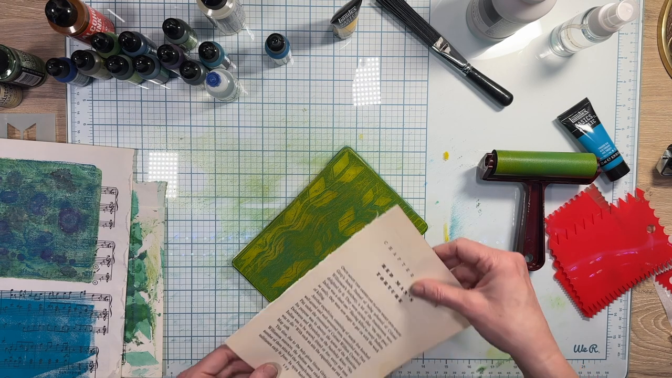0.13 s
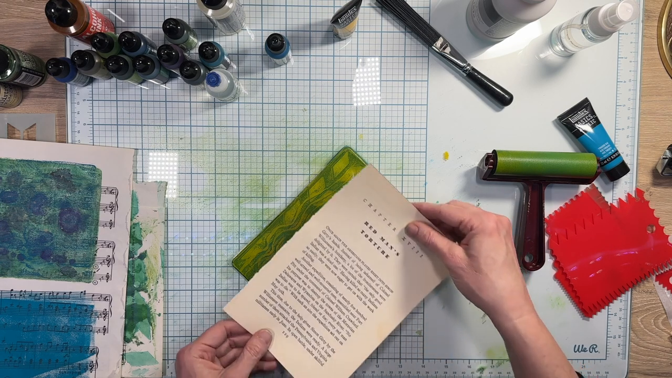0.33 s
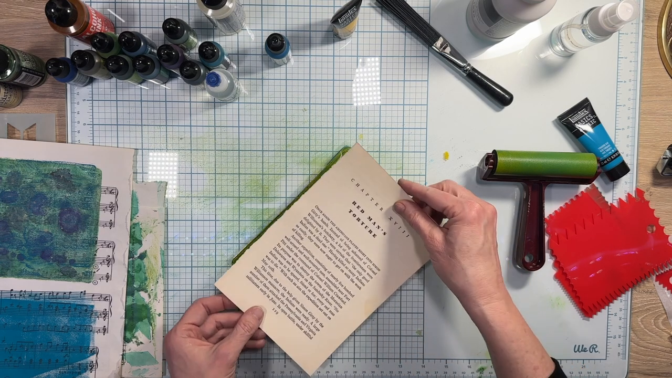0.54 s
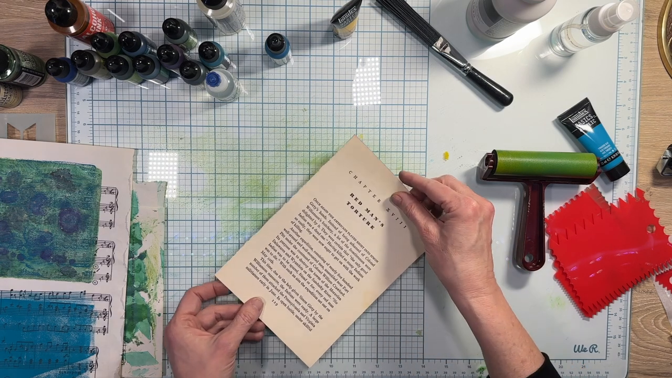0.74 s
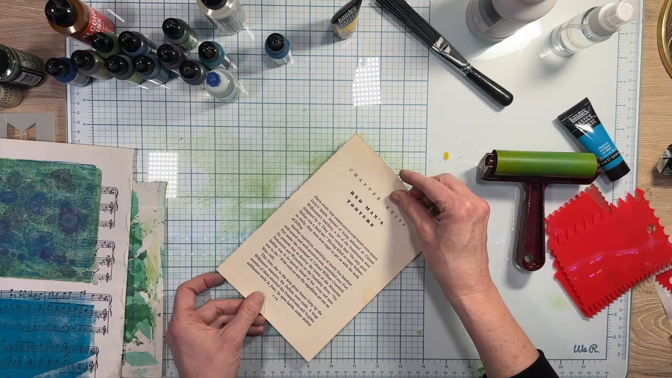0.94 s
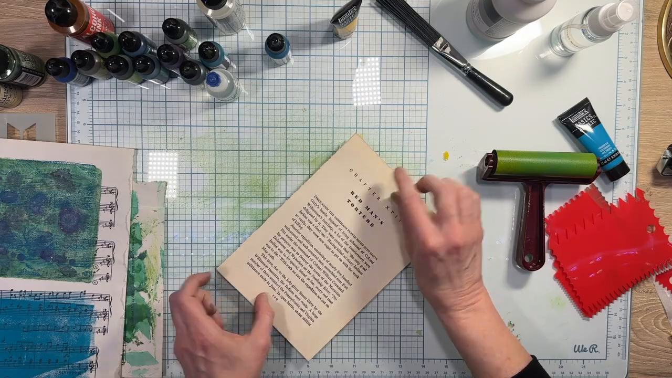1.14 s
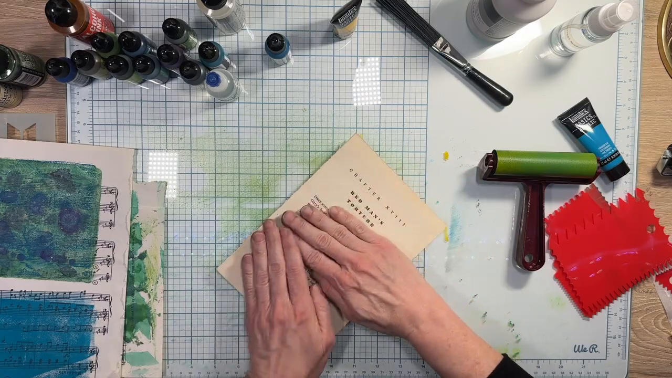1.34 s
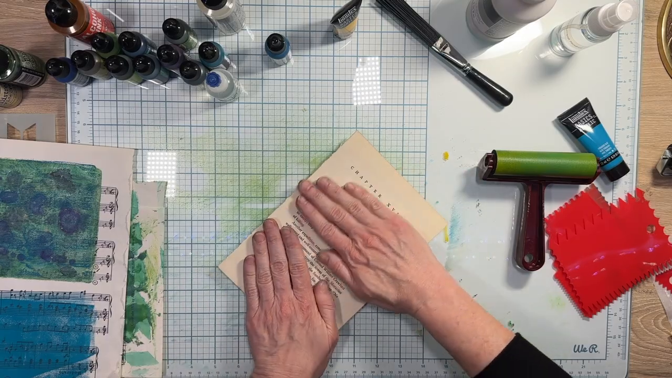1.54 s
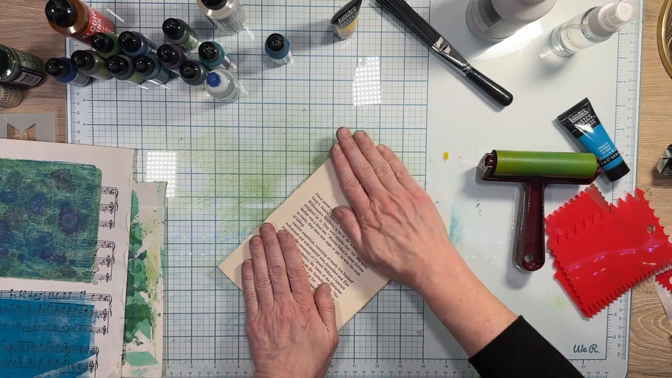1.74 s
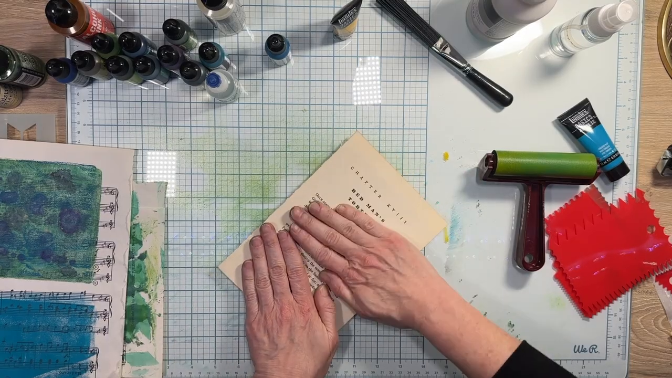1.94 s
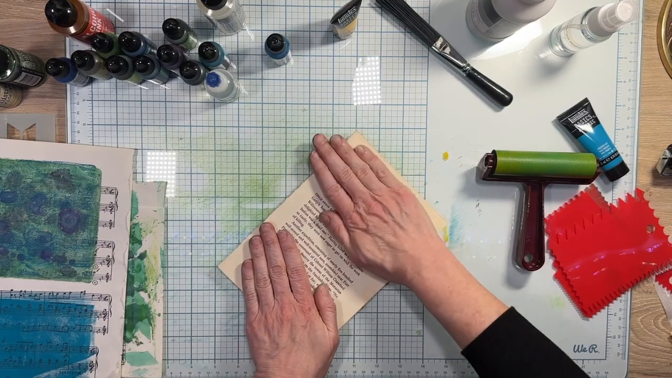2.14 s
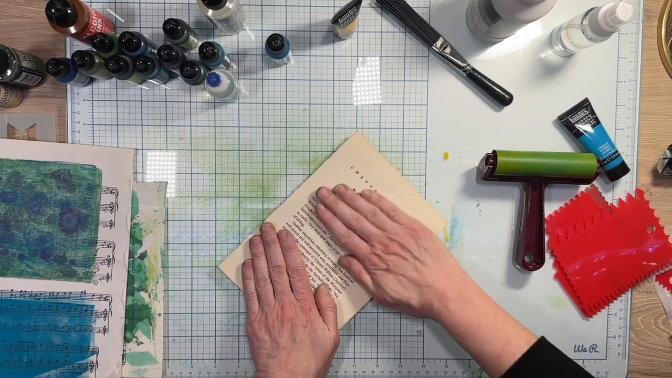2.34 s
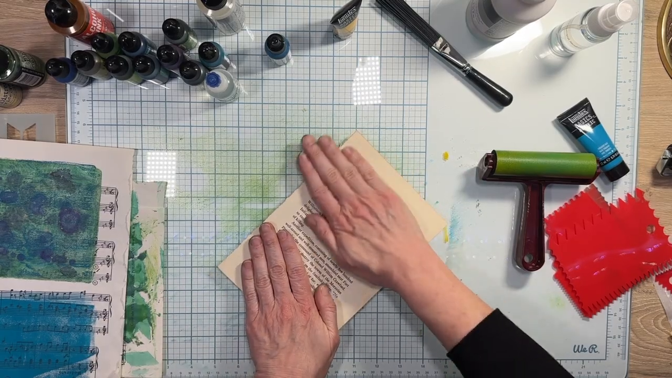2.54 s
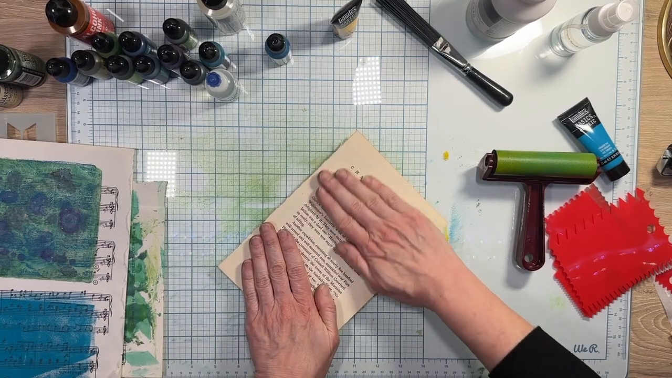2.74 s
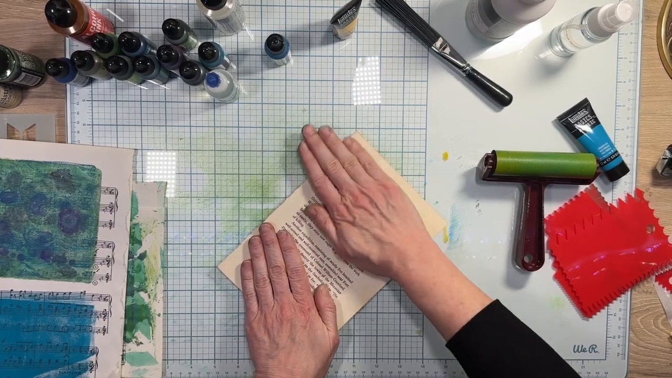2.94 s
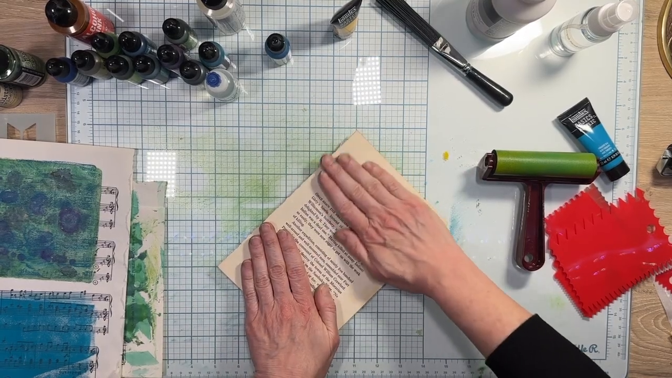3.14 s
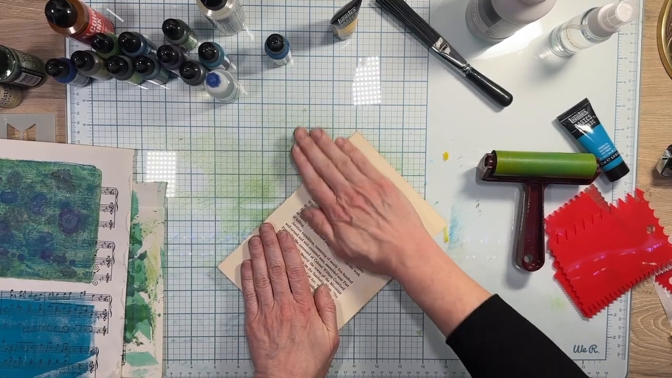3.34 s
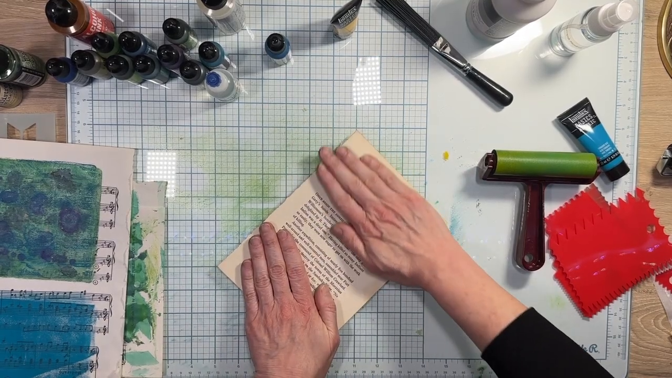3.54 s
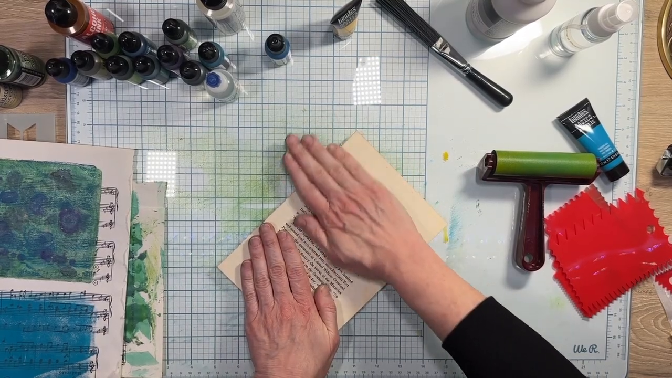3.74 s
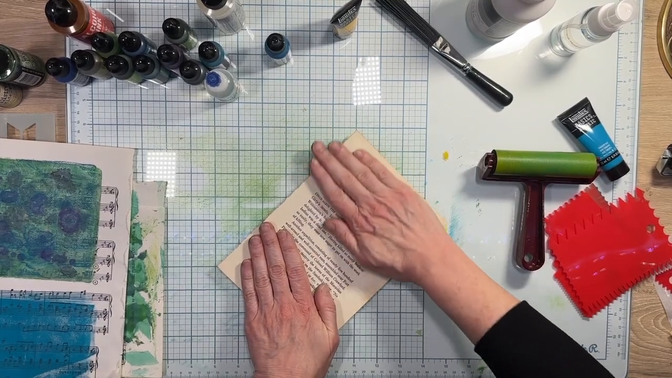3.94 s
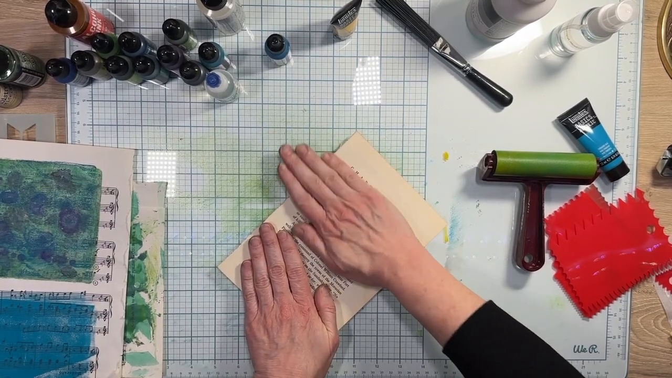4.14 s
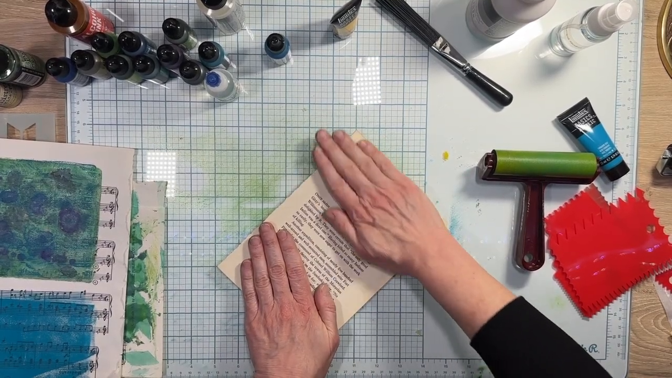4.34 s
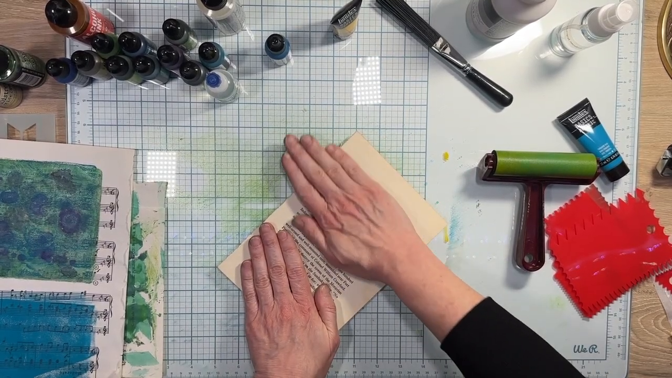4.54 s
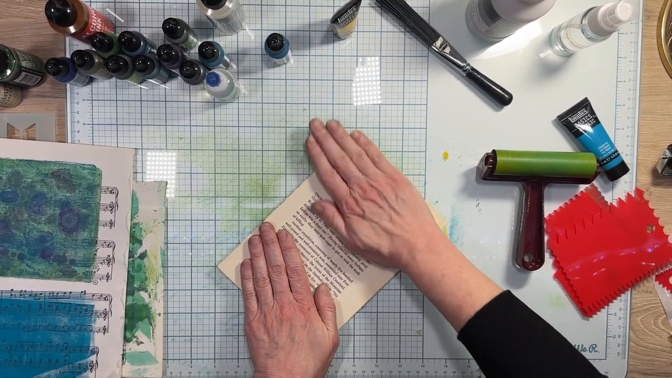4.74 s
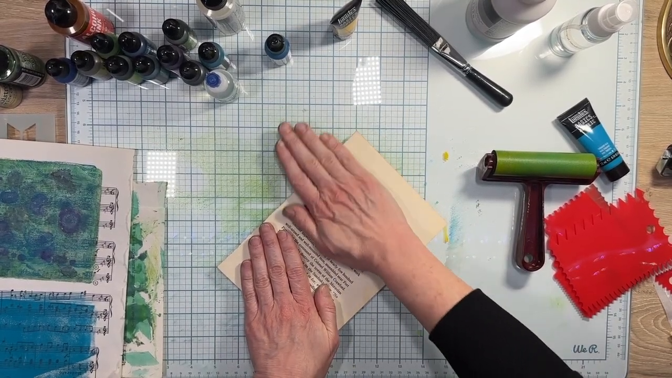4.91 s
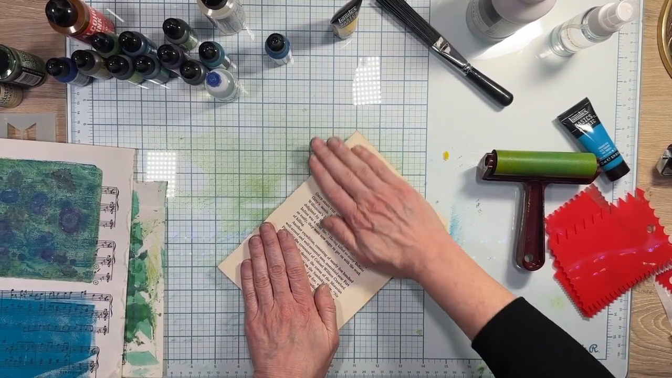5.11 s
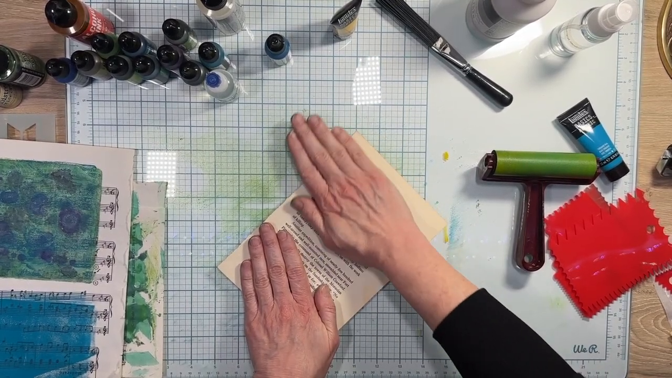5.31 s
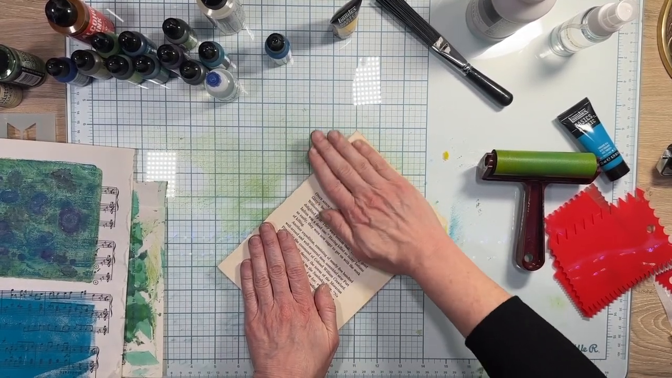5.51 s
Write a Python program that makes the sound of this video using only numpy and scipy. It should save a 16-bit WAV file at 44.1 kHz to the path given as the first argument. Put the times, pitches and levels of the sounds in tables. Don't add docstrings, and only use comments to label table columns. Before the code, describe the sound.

In a small, quiet, rather dry room, paired microphones close above a craft table catch a sheet of paper being laid on a soft printing plate. At 0 s the sheet buckles with a papery flutter, then flaps at 0.12 s with a sharp crack, the loudest moment. Soft slides fade until about 0.75 s, with a faint airy whistle rising at 0.15-0.45 s. Light finger brushes follow, then a crisp pat and snap at 1.06 s. Near 1.38 s a gentler snap and a low, dull table thump mark the palm settling. From 1.5 s the palm rubs back and forth: fine, bright, dry hissing swishes, clearly separated until 2.3 s, then faster and more continuous, about five per second, alternating slightly in brightness. Faint low table hum, barely audible tones from plate and mat, and very quiet room air lie beneath. The rubbing continues to the end, around 5.7 s.

```python
import sys
import numpy as np
from scipy import signal
from scipy.fft import rfft, irfft, next_fast_len
from scipy.io import wavfile
from scipy.ndimage import uniform_filter1d

SR = 44100
rng = np.random.default_rng(int(sys.argv[2]) if len(sys.argv) > 2 else 0)


def convert_level_to_amplitude(level_db):
    exponent = np.asarray(level_db, float) / 20
    return 10 ** exponent


def wrap_up_sound(samples):
    columns = np.atleast_2d(samples).T
    tamed = np.clip(columns, -1, 1)
    steps = np.round(tamed * 32767).astype(np.int16)
    wavfile.write(sys.argv[1], SR, steps)


N = 249945

# (turn [s], hiss at the turn [dB],
# fastest after [s], hiss when fastest [dB], extra sizzle [dB])
PALM_STROKES = [(1.469, -65.5, 0.16, -52, 1), (1.728, -70, 0.14, -51.5, 2.5),
                (1.943, -71, 0.097, -51.5, 0.5), (2.152, -72.5, 0.081, -50.5, 1),
                (2.34, -58, 0.11, -53, 4.5), (2.57, -54, 0.073, -52.5, 1), (2.7, -52.5, 0.14, -53, 5.5),
                (2.936, -58, 0.082, -50, -2), (3.12, -55.5, .08, -53.5, 5.5), (3.33, -55, 0.056, -51, -2),
                (3.5, -56, 0.083, -52, 5), (3.7, -53, 0.04, -51.5, -3), (3.89, -56, 0.076, -52, 3.5),
                (4.151, -54, 0.064, -52.5, -2.5), (4.28, -56, 0.083, -52, 3.5),
                (4.48, -52.5, 0.1, -51, -5.5), (4.67, -58.5, 0.074, -53.5, 3.5),
                (4.85, -53, 0.11, -51, -6.5), (5.071, -54.5, 0.072, -52.5, 3.5), (5.27, -54, 0.09, -51, -5),
                (5.47, -56.5, .08, -54, 4.5), (5.66, -56, .08, -44.5, -17)]
# (start [s], length [s], hiss [dB], sheet against hiss [dB],
# sizzle against hiss [dB])
FREE_SLIDES = [
    (-.04, 0.2, -55.5, -8.5, 2),
    (.13, 0.16, -64.5, 6.5, 9),
    (.24, 0.28, -68, 13, 6),
    (.46, 0.15, -66.5, 13.5, -3.5),
    (.59, 0.098, -72, 14.5, -12),
    (.66, 0.13, -78, 9, -4),
]
PLATE_BRUSHES = [
    (.755, 0.096, -69, 6, -8.5),
    (.86, 0.091, -66.5, -4.5, -7.5),
    (.985, 0.059, -65, -30, -1),
    (1.015, 0.073, -54.5, -17, -1.5),
    (1.095, 0.044, -67, -6, 2.5),
    (1.34, 0.047, -64.5, 4.5, 6.5),
    (1.37, 0.092, -61, -3, 3),
]
# (lowest [Hz], highest [Hz])
RUB_RANGES = [(2500, 7000), (600, 1050), (900, 2200), (8500, 15500)]
REST_LEVELS = [
    [-89],
    [-93],
    [-88],
    [-93],
]
# (frequency [Hz], level per Hz [dB])
FRICTION_COLOUR = [(88, -37), (150, -22.5), (474, -22), (686, -16), (786, -21), (883, -13), (1330, -8),
                   (1680, -3.5), (3140, -1.5), (6570, -2.5), (7830, -1.5), (10900, -1.5), (15800, -6.5)]
# (start [s], level [dB], fade [dB per s])
SHEET_WOBBLES = [
    (0.0, -44.5, 181),
    (.15, -64.5, 128),
]
# (time [s], pitch [Hz], level [dB])
GAP_WHISTLE = [(.13, 3310, -87), (.17, 3600, -60.5), (.24, 4200, -62), (.3, 4605, -63.5), (.36, 5400, -65),
               (.41, 5900, -62), (.46, 6200, -103)]
# (time [s], pitch [Hz], level [dB])
PLATE_SINGING = [(1.4, 691, -110), (1.55, 692, -85), (2.4, 685, -88), (4.2, 696, -88), (4.5, 695, -74.5),
                 (5.3, 694, -78), (5.67, 685, -79)]
# (time [s], pitch [Hz], level [dB])
MAT_SINGING = [(1.5, 340, -105), (1.8, 340, -103), (2.3, 330.6, -94), (2.5, 340, -87), (3.3, 340, -87.5),
               (3.7, 340, -91.5), (5.67, 340, -102)]
# (time [s], peak [dB], length [s], modes fade above [Hz])
SHEET_FLAPS = [
    (0.0, -32, 0.018, 1155),
    (0.022, -36, 0.01, 1150),
    (0.034, -42.5, .008, 1150),
    (0.114, -30, 0.004, 2500),
    (0.1189, -22.5, 0.0061, 3000),
]
# (frequency [Hz], level [dB], 60 dB fade [s])
SHEET_MODES = [(340, -12.5, 0.12), (470, 0.5, 0.028), (567, -12.5, 0.066), (643, -3, 0.06), (853, 8, 0.047),
               (950, 2.5, 0.037), (1020, -1, .035), (1194, -1, 0.044), (1450, 3, 0.034), (1510, 0.5, 0.023),
               (1950, -8, 0.083), (2500, -6, .03), (2655, -12, 0.066)]
# (time [s], peak [dB], centre [Hz])
SHEET_PATS = [(0.765, -55, 2500), (1.059, -51, 2790), (1.059, -41, 3400), (1.0615, -46, 3580),
              (1.0644, -33, 3940), (1.066, -43, 1410), (1.069, -36.5, 1480), (1.08, -42.5, 400),
              (1.345, -64, 7000), (1.357, -57, 2500), (1.385, -44, 3500), (1.388, -43, 2000),
              (1.396, -47, 400), (.9, -58, 506), (1.362, -46, 330), (2.4, -48, 900)]
# (frequency [Hz], level [dB], 60 dB fade [s])
PLATE_MODES = [(260, -8, .05), (500, -8, .04), (820, -8, .04), (1400, 0, .028), (2520, -3, .03),
               (2850, 2, .028), (3350, -2, .02), (4600, -6, .012), (5500, -7, .01), (7000, -8, .008),
               (9000, -8, .006), (11000, -8, .006)]
# (time [s], peak [dB])
FLAT_SNAPS = [
    (1.0645, -31),
    (1.3855, -37),
]
# (time [s], peak [dB])
PALM_SHOVES = [(1.383, -52), (1.397, -54), (1.422, -52), (1.437, -42), (1.452, -46), (1.56, -58)]
# (frequency [Hz], level per Hz [dB])
TABLE_COLOUR = [(12, -47.5), (20, -22), (42, -4), (59, 1.5), (92, -3.5), (260, -16.5), (340, -45),
                (570, -120)]
# (time [s], level [dB])
ARM_WEIGHT = [(0.0, -77), (.6, -76.5), (1.3, -87), (1.38, -64), (1.6, -79), (2.3, -81), (2.9, -75),
              (5.67, -74.5)]
# (time [s], level [dB])
WEIGHT_SHIFTS = [(.04, -73), (.18, -67), (.47, -81), (0.599, -84.5), (1.1, -76), (1.52, -88), (1.96, -68),
                 (2.18, -71.5), (2.92, -77)]
# (frequency [Hz], level per Hz [dB])
AIR_COLOUR = [(18, -31), (30, -3), (75, -10.5), (258, -7.5), (344, -6), (581, -30.5), (1700, -6),
              (2660, -19), (8420, -21), (11500, -10.5), (15800, -19)]
# (frequency [Hz], share [0 to 1])
DIRECT_SHARE = [(60, 0.87), (150, 0.88), (600, 0.57), (2000, 0.77), (4000, 0.71), (7000, 0.44),
                (8200, 0.92), (8500, 0.14), (14000, 1), (15000, 0.28)]
# (frequency [Hz], phase [radians])
LEFT_LEAD = [(60, 0), (1500, 0), (3600, .8), (5600, .2), (6600, .7), (7600, 2.3), (8100, 3.1), (8350, .5),
             (8800, 0), (16000, 0)]
SHARED_EDGES = (8350, 9700, 10400, 14100, 14900, 15780)
OWN_SIDES = [(.85, .45, .03, .25, .8), (.12, .03, .025, .15, .75)]
# (lowest [Hz], highest [Hz], chance [0 to 1])
MIDDLE_HOLES = [(7750, 8150, .2), (8300, 8800, .03), (15200, 15800, .08), (15550, 15800, .2)]

SIZE = next_fast_len(N + SR // 4)
HZ = np.maximum(np.fft.rfftfreq(SIZE, 1 / SR), 1)
TIME = np.arange(N) / SR


def strokes():
    stuck_s, loose_db = 2.35, 2
    loose_hold, stuck_hold = 1.7, 0.94
    rubbed_db, settle_db, settle_s = -53, -7, 0.31
    turn, slow_db, after, fast_db, extra_db = np.transpose(PALM_STROKES)
    fastest = turn + after
    phase = np.interp(TIME, np.ravel([turn, fastest], "F"), np.arange(2 * len(turn)) / 2)
    swing = np.sin(np.pi * phase) ** 2
    loose = TIME < stuck_s
    hold = np.where(loose, loose_hold, stuck_hold)
    speed = np.tanh(hold * swing) / np.tanh(hold)
    slow = convert_level_to_amplitude(np.interp(TIME, turn, slow_db))
    fast = convert_level_to_amplitude(np.interp(TIME, fastest, fast_db))
    hiss_db = 20 * np.log10(slow + (fast - slow) * speed)
    above_db = hiss_db - rubbed_db
    pad_db = -75.5 + settle_db * np.exp(-np.abs(TIME - turn[0]) / settle_s) + 0.4 * above_db
    sheet_db = -65.5 + loose_db * swing * loose + 0.45 * above_db
    sizzle_db = hiss_db + 1.38 + np.interp(TIME, fastest, extra_db) * swing ** (1.27 / 2)
    fade_in = np.clip((TIME - turn[0]) / 0.018 + 1, 0, 1)
    return convert_level_to_amplitude(2 * np.array([hiss_db, pad_db, sheet_db, sizzle_db])) * fade_in


def touches(rows, pad_db):
    peak_share, linger_db, linger_t60_s = 0.4, -14.5, 0.34
    out = 0
    for start, length, hiss_db, sheet_db, sizzle_db in rows:
        top = start + peak_share * length
        phase = np.interp(TIME, [start, top, start + length], [0, .5, 1])
        swell = np.sin(np.pi * phase) ** 2
        linger = (TIME > top) * convert_level_to_amplitude(2 * linger_db - 120 * np.abs(TIME - top) / linger_t60_s)
        parts_db = hiss_db + np.array([[0], [sheet_db + pad_db], [sheet_db], [sizzle_db]])
        out = out + convert_level_to_amplitude(2 * parts_db) * (swell + linger)
    return out


def brushes(rows):
    return touches(rows, pad_db=-19)


def contact_db():
    moving = strokes() + touches(FREE_SLIDES, pad_db=-18) + brushes(PLATE_BRUSHES)
    return 10 * np.log10(moving + convert_level_to_amplitude(2 * np.array(REST_LEVELS)))


def uneven_slips():
    grain_db = 1.5
    return rng.standard_normal(N) * convert_level_to_amplitude(grain_db * np.minimum(rng.exponential(1, N), 5))


def rubbing(slips):
    patchy_db, shared_db, lift_db = 0.98, 0.54, 1.0
    gains, centres = [], []
    for (low, high), level_db in zip(RUB_RANGES, contact_db()):
        inside = (HZ > low) & (HZ < high)
        power = np.sum(convert_level_to_amplitude(2 * at_hz(FRICTION_COLOUR, HZ))[inside]) / len(HZ)
        gains.append(level_db - 10 * np.log10(power))
        centres.append(np.log(low * high) / 2)
    rank = np.argsort(centres)
    ordered = np.array(centres)[rank]
    nodes = np.log(np.geomspace(150, 15000, num=15))
    together = shared_db * drift(14)
    even, colour = rms_one(slips), convert_level_to_amplitude(at_hz(FRICTION_COLOUR, HZ))
    out = np.zeros(N)
    for k, node in enumerate(nodes):
        weights = [np.interp(node, ordered, rank == j) for j in range(len(gains))]
        level_db = sum(w * g for w, g in zip(weights, gains))
        level_db = level_db + together + patchy_db * drift(15) + lift_db
        part = np.interp(np.log(HZ), nodes, np.arange(len(nodes)) == k)
        out += convert_level_to_amplitude(level_db) * filtered(even, colour * part)
    return out


def fingertip_pocket(slips):
    pocket = filtered(slips, hump(centre_hz=2750, width_hz=1600))
    return np.sqrt(brushes(PLATE_BRUSHES[:3])[0]) * rms_one(pocket)


def loose_wobble(slips):
    low = filtered(slips, hump(centre_hz=480, width_hz=1300))
    level = sum((TIME >= s) * convert_level_to_amplitude(db - fade * np.abs(TIME - s)) for s, db, fade in SHEET_WOBBLES)
    return level * rms_one(low)


def friction():
    slips = uneven_slips()
    return rubbing(slips) + loose_wobble(slips) + fingertip_pocket(slips)


def whistle(rows, width_hz):
    hz, level_db = in_time(rows)
    lowpass = signal.butter(2, width_hz / 2, fs=SR, output="sos")
    slow = signal.sosfilt(lowpass, rng.standard_normal((2, N)))
    turn = 2 * np.pi * np.cumsum(hz) / SR
    return convert_level_to_amplitude(level_db) * rms_one(slow[0] * np.cos(turn) + slow[1] * np.sin(turn))


def flaps():
    out = np.zeros(N // 8)
    t = np.arange(len(out)) / SR
    for hz, level_db, t60 in SHEET_MODES:
        push = 0
        for s, db, length, top_hz in SHEET_FLAPS:
            burst = (t >= s) * np.exp(-np.abs(t - s) / length) / np.sqrt(length * SR)
            push = push + convert_level_to_amplitude(db) * burst / (1 + (hz / top_hz) ** 4)
        out += ring(push * rng.standard_normal(len(t)) * convert_level_to_amplitude(level_db - 5.5), hz, t60)
    return np.pad(out, (0, N - len(out)))


def pats():
    spread_db = 9.5
    at = [round(row[0] * SR) for row in SHEET_PATS]
    chance = rng.normal(0, 2.0, (len(SHEET_PATS), len(PLATE_MODES)))
    out = np.zeros(N)
    for k, (hz, level_db, t60) in enumerate(PLATE_MODES):
        clicks = np.zeros(N)
        clicks[at] = [convert_level_to_amplitude(db + level_db - 6 + c - spread_db * np.log2(hz / centre_hz) ** 2)
                      for (s, db, centre_hz), c in zip(SHEET_PATS, chance[:, k])]
        out += ring(clicks, hz, t60)
    return out


def snaps():
    band = signal.butter(1, [1500, 9000], "band", fs=SR, output="sos")
    return signal.sosfilt(band, clicks_at(FLAT_SNAPS) + 1e-18) * 2


def table_hum():
    lean_s = .045
    hum = rms_one(filtered(rng.standard_normal(N), convert_level_to_amplitude(at_hz(TABLE_COLOUR, HZ))))
    leans = sum(convert_level_to_amplitude(db) * np.exp(-((TIME - s) / lean_s) ** 2) for s, db in WEIGHT_SHIFTS)
    return (convert_level_to_amplitude(in_time(ARM_WEIGHT)[0]) + leans) * hum


def table_swing():
    soft = np.hanning(round(0.0038 * SR))
    push = np.convolve(clicks_at(PALM_SHOVES), soft / soft.sum())[:N]
    return ring(push, hz=66.5, t60=.21)


def air():
    hiss = filtered(rng.standard_normal(N), convert_level_to_amplitude(at_hz(AIR_COLOUR, HZ)))
    return convert_level_to_amplitude(-76) * rms_one(hiss)


def room(x):
    room_db, t60_s = -14.5, .12
    t = np.arange(round(.4 * SR)) / SR
    tail = rng.standard_normal((2, len(t))) * convert_level_to_amplitude(-60 * t / t60_s) * (t > .004)
    tail = signal.lfilter([.3, -.3], [1, -1.63, .651], tail)
    tail = tail / np.sqrt(np.sum(tail ** 2) / 2)
    return convert_level_to_amplitude(room_db) * signal.fftconvolve(x[None], tail, axes=1)[:, :N]


def ports(sound):
    left_db, scatter_t60_s = 0.68, 0.12
    t = np.arange(round(.15 * SR)) / SR
    share = np.clip(at_hz(DIRECT_SHARE, HZ), 0, 1)
    turn = np.exp(.5j * at_hz(LEFT_LEAD, HZ))
    pair = filtered(sound, np.sqrt(share) * np.array([turn, 1 / turn]))
    poses = np.array([drift(13) for _ in range(7)])
    for weight in poses / np.sqrt(np.sum(poses ** 2, axis=0)):
        scatter = rng.standard_normal((2, len(t))) * convert_level_to_amplitude(-60 * t / scatter_t60_s)
        scatter = rfft(scatter / np.sqrt(np.sum(scatter ** 2) / 2), SIZE)
        pair += filtered(weight * sound, np.sqrt(1 - share) * scatter)
    return pair * convert_level_to_amplitude(np.array([[left_db], [-left_db]]))


def rms_one(x):
    return x / np.sqrt(np.mean(x ** 2) + 1e-20)


def in_time(rows):
    s, *columns = np.transpose(rows)
    return [np.interp(TIME, s, c) for c in columns]


def at_hz(points, hz):
    points = np.array(points, float)
    return np.interp(np.log(hz), np.log(np.maximum(points[:, 0], 1)), points[:, 1])


def clicks_at(rows):
    clicks = np.zeros(N)
    clicks[[round(s * SR) for s, db in rows]] = convert_level_to_amplitude(np.array(rows)[:, 1])
    return clicks


def drift(rate):
    r = np.exp(-80 * np.pi * rate / SR)
    slow = signal.lfilter([1], [1, -2 * r, r * r], rng.standard_normal(N // 40 + 2002))[2000:]
    return np.interp(np.arange(N) / 40, np.arange(len(slow)), rms_one(slow))


def ring(clicks, hz, t60):
    r, w = convert_level_to_amplitude(-60 / (t60 * SR)), 2 * np.pi * hz / SR
    return signal.lfilter([0, np.sin(w)], [1, -2 * r * np.cos(w), r * r], clicks + 1e-18)


def filtered(x, response):
    return irfft(rfft(x, SIZE) * response, SIZE)[..., :N]


def hump(centre_hz, width_hz):
    return 1 / (1 + ((HZ - centre_hz) / (width_hz / 2)) ** 2) ** 2


def scene():
    soft = friction() + whistle(GAP_WHISTLE, width_hz=1000)
    soft = soft + whistle(PLATE_SINGING, width_hz=46) + whistle(MAT_SINGING, width_hz=72)
    soft = soft + table_hum() + air()
    highpass = signal.butter(4, 270, "high", fs=SR, output="sos")
    hits = signal.sosfilt(highpass, flaps() + pats() + snaps())
    return ports(soft) + table_swing() + hits + room(hits)


def band_limit(x):
    return signal.sosfilt(signal.butter(12, 16230, fs=SR, output="sos"), x)


def record(dry):
    frame, late_s = 2048, 2.62
    mid, side = (dry[0] + dry[1]) / 2, (dry[0] - dry[1]) / 2
    mid = filtered(mid, HZ < SHARED_EDGES[-1])
    kept = filtered(side, HZ < SHARED_EDGES[0])
    luck = rng.random((N // frame + 1, 1))
    late = (np.arange(len(luck)) * frame / SR > late_s).astype(int)
    keeps = (luck < np.array(OWN_SIDES)[late]).T
    for low, high, keep in zip(SHARED_EDGES, SHARED_EDGES[1:], keeps):
        gate = uniform_filter1d(np.repeat(keep * 1., frame)[:N], size=512)
        kept = kept + gate * filtered(side, (HZ >= low) & (HZ < high))
    for low, high, chance in MIDDLE_HOLES:
        drops = rng.random(len(luck)) < chance
        hole = uniform_filter1d(np.repeat(drops * 1., frame)[:N], size=512)
        mid = mid - hole * filtered(mid, (HZ > low) & (HZ < high))
    return band_limit(np.array([mid + kept, mid - kept]))


dry = scene()
out = record(dry)
wrap_up_sound(out)
```